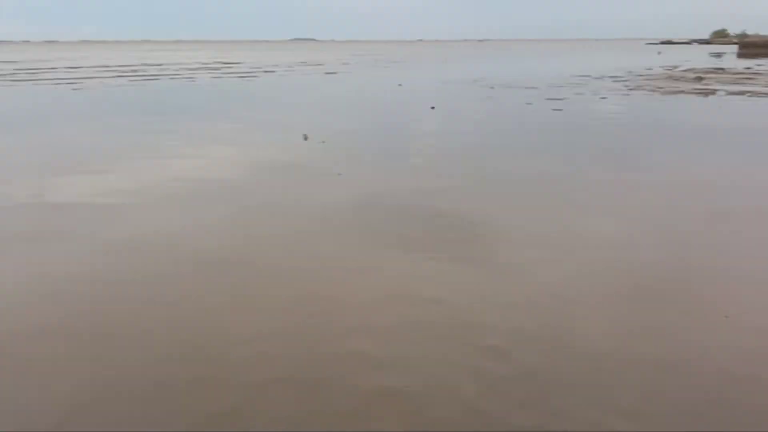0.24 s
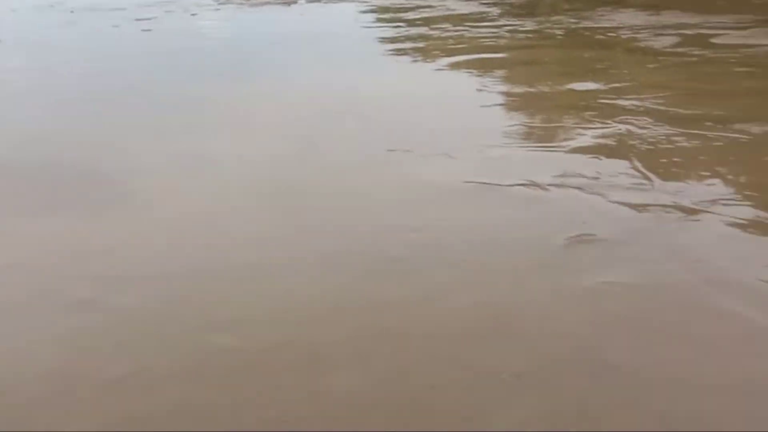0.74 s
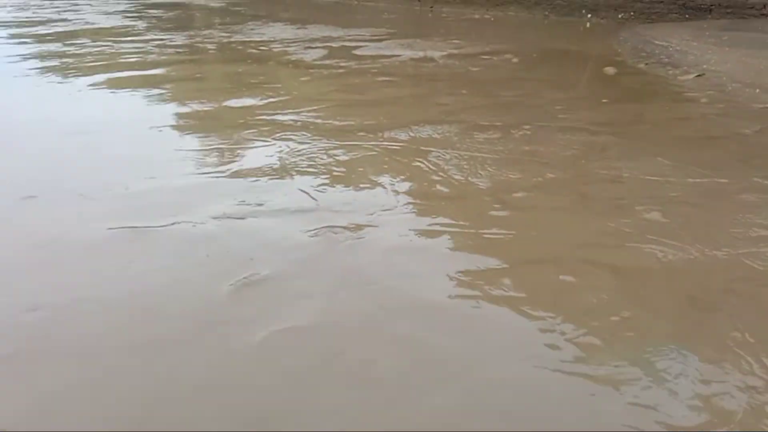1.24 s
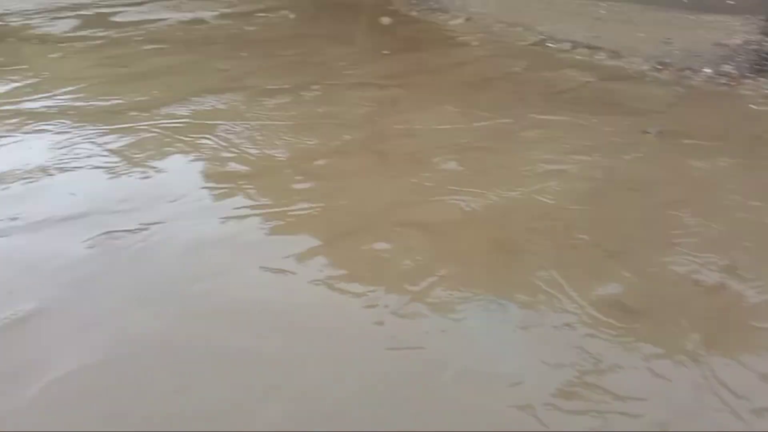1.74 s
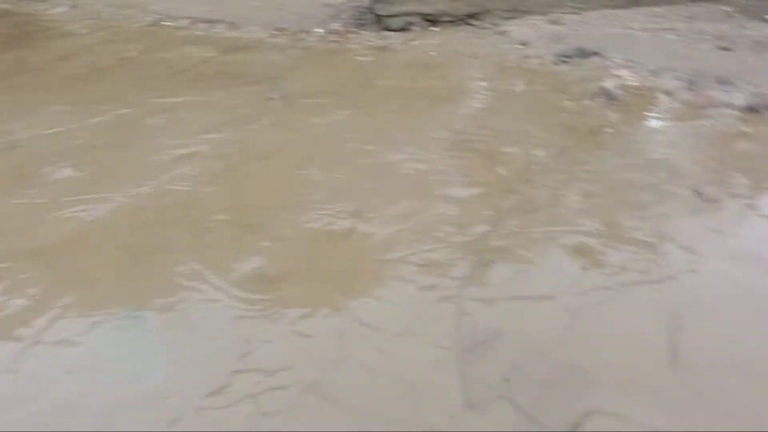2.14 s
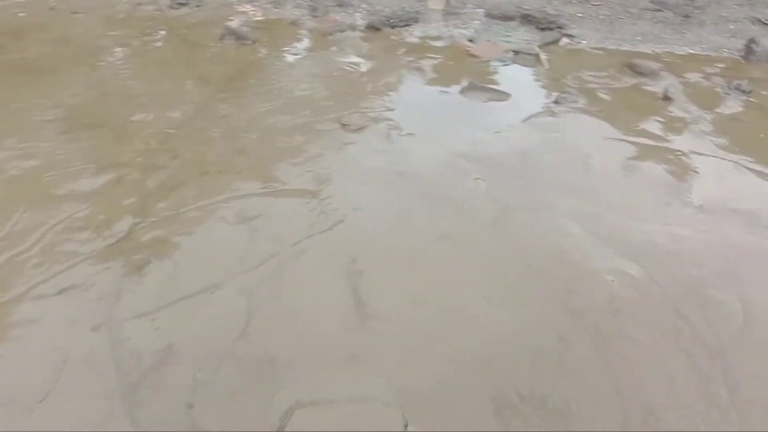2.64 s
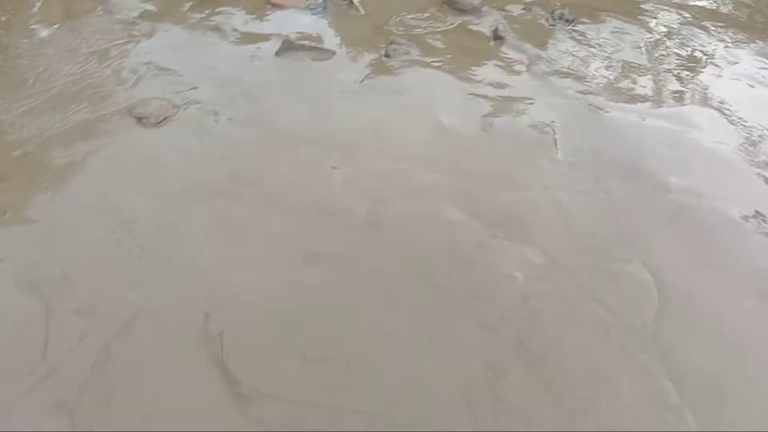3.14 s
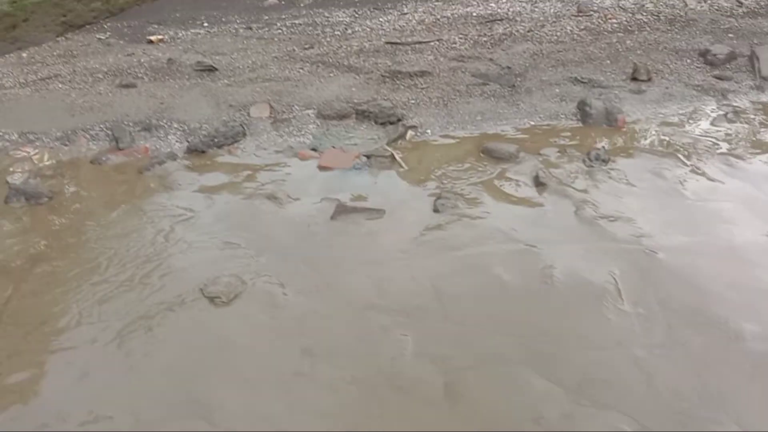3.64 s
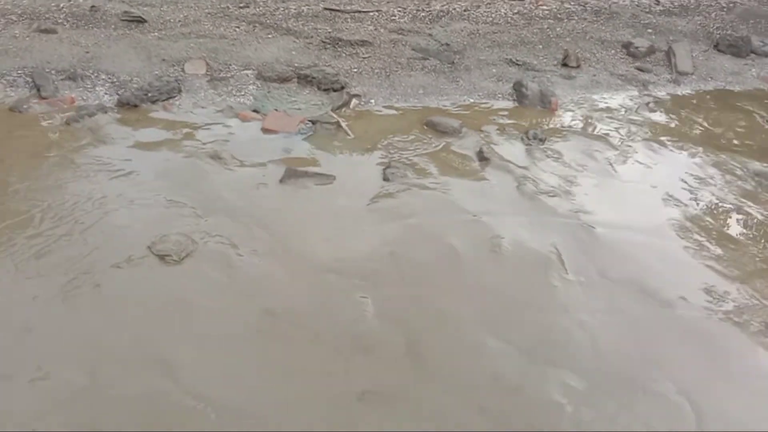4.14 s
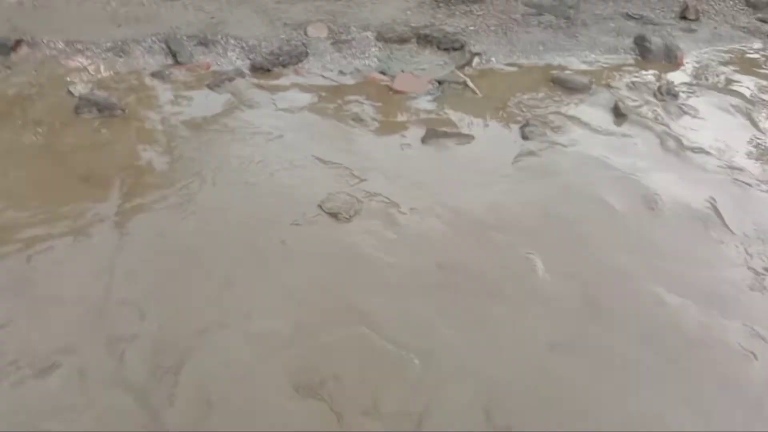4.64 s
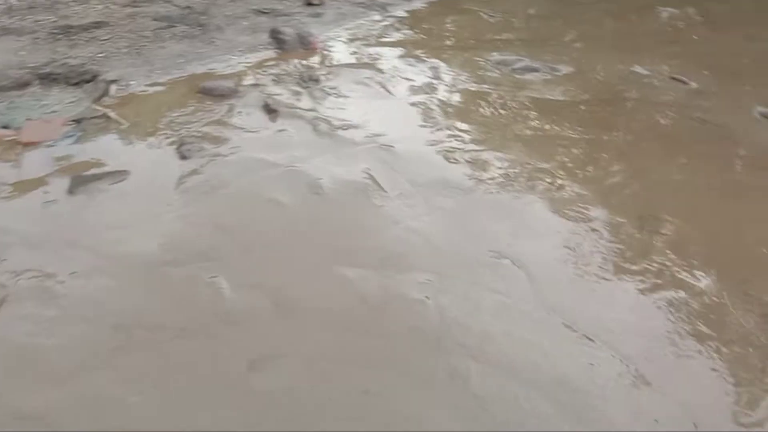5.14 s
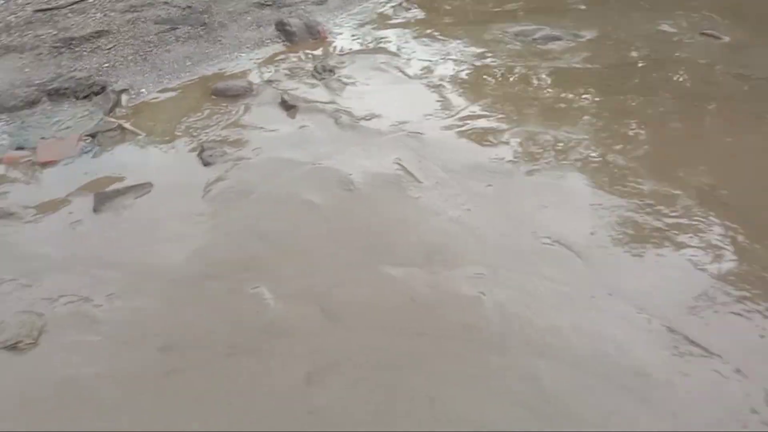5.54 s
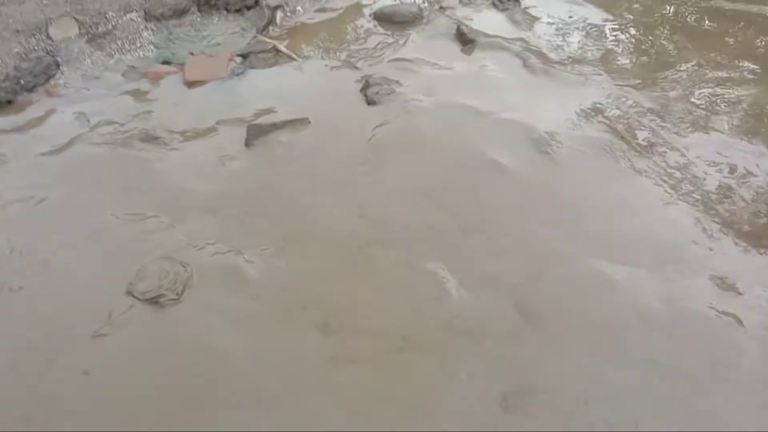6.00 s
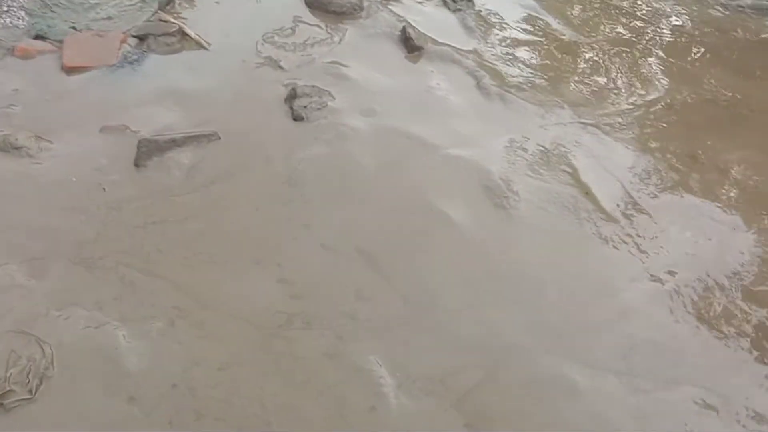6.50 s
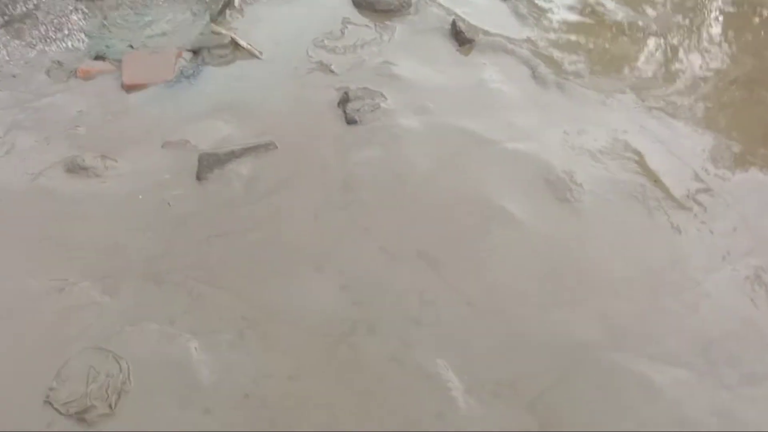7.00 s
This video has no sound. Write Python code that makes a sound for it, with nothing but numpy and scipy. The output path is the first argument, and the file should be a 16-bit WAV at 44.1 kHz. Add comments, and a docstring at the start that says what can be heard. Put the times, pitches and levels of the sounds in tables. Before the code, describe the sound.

An open, nearly echo-free muddy shore, heard close up, with faint hiss and light wind. A small pop or two at 0.2-0.3 s leads into a squelchy double step at 0.4-0.7 s, full of rising bubble blips, wet crackle and a hollow pop. Steps then pause while low wind rumbles and knocks the microphone, heaviest from 1.5 to 2.3 s. A deeper, gulping, sloshing step runs 1.95-2.4 s, with a distinct plop near 2.6. From 3.0 to 4.0 s softer squelches give way to many small bubbles and seeping water. A quieter stretch follows, with a plop at 4.5 and a wind bump at 4.6. A strong splashy squelch with bright spatter comes at 5.0-5.4 s, then a lull with soft wind. Another sharp, bubbly step bursts at 6.6-6.85 s, with a last little blip near 6.96 before it settles. Very faint, thin bird whistles fall far away.

```python
"""First a faint background hiss and light wind at the microphone, then slow steps in soft mud on an open tidal flat.
Each step is built from swarms of rising bubble notes, a slosh of noise, wet crackle and a fine spray of ticks.
Squirts of crackle, loud single bubbles, popping air pockets and seeping water fill in the mud, with a short scatter.
Noise gusts and low knocks buffet the microphone; far off, thin falling whistles are the birds."""
import sys
import numpy as np
from scipy import signal
from scipy.fft import rfft, irfft
from scipy.io import wavfile
from scipy.ndimage import uniform_filter1d

SR = 44100
rng = np.random.default_rng(int(sys.argv[2]) if len(sys.argv) > 2 else 0)


def to_wav(sig):
    """Store sig (one row per channel, or 1-D mono) as 16-bit WAV at the path in sys.argv[1].

    Samples outside -1..1 are clipped; the rate is SR.
    """
    pcm = np.clip(np.atleast_2d(sig), -1, 1) * 32767
    pcm = np.round(pcm).astype(np.int16)
    wavfile.write(sys.argv[1], SR, pcm.T)  # frames by channels


N = 320166
TIME = np.arange(N) / SR


def amp(db):
    """Decibels to gain."""
    return 10 ** (np.asarray(db) / 20)


def steadied(x, seconds):
    """Holds the running rms near 1, leaving faster detail alone."""
    size = max(int(seconds * SR / 2), 2)
    power = abs(uniform_filter1d(uniform_filter1d(x ** 2, size), size))
    return x / np.sqrt(power + 1e-3 * power.mean() + 1e-20)


def add(mix, s, sound):
    """Mixes a sound in at time s, cutting it at the end of the mix."""
    part = mix[max(round(s * SR), 0):][:len(sound)]
    part += sound[:len(part)]


def impulse(points, size=4096):
    """The minimum-phase impulse response of a spectrum that falls 24 dB per octave beyond its ends."""
    hz, db = np.transpose(points)
    octave = np.log2(np.fft.rfftfreq(size, 1 / SR) + 1)
    below = np.maximum(np.log2(hz[0]) - octave, 0)
    above = np.maximum(octave - np.log2(hz[-1]), 0)
    level_db = np.interp(octave, np.log2(hz), db) - 24 * (below + above)
    log_gain = np.log(amp(np.maximum(level_db, -100)))
    # folding the cepstrum onto positive time makes the response causal
    fold = np.r_[1, np.full(size // 2 - 1, 2), 1, np.zeros(size // 2 - 1)]
    return irfft(np.exp(rfft(irfft(log_gain) * fold)))


def coloured(x, points):
    """Gives x a spectrum."""
    return signal.oaconvolve(x, impulse(points))[:len(x)]


# the faint hiss behind everything: (time [s], level [dB], centre of its broad hump [Hz])
HISS_COURSE = [(0, -63.5, 1770), (.3, -61, 2370), (1.05, -64, 2700), (1.35, -65, 3420), (2.72, -63.5, 3000),
               (2.87, -74, 1970), (3.25, -62.5, 2480), (4.3, -68, 2000), (5.65, -64.5, 1830),
               (5.95, -71, 1810), (6.299, -65.5, 1570), (7.26, -73.5, 1870)]
# tone of the hiss: (frequency [Hz], relative level [dB])
HISS_SPECTRUM = [(450, -2), (800, -4.5), (2100, -5.5), (3600, -9), (5600, -23), (7700, -11), (9000, -38.5),
                 (15000, -20.5)]


def background_hiss(uneven_db, hump_db, hump_octaves):
    """Faint background hiss, uneven in level and tone; a broad hump in it slides up and down."""
    hz, t, z = signal.stft(rng.standard_normal(N), SR, nperseg=512)
    times, level_db, centre_hz = np.transpose(HISS_COURSE)
    uneven = rng.standard_normal(z.shape[::-1])
    uneven = uniform_filter1d(uneven, size=16, axis=0)  # smooth in time
    uneven = uniform_filter1d(uneven, size=4, axis=1).T  # smooth in frequency
    octaves_off = np.log2((hz[:, None] + 1) / np.interp(t, times, centre_hz))
    hump = np.exp(-(octaves_off / hump_octaves) ** 2)
    gain = amp(uneven_db * uneven / uneven.std() + hump_db * hump)
    noise = signal.istft(z * gain, nperseg=512)[1][:N]
    return amp(np.interp(TIME, times, level_db)) * steadied(coloured(noise, HISS_SPECTRUM), 0.26)


# the light air between gusts: (time [s], level before the eddies [dB])
LULL_COURSE = [(0, -65.5), (.6, -55), (2.65, -51), (3.55, -59.5), (4.35, -45.5), (5.15, -47), (5.85, -43.5),
               (6.6, -58.5), (7.26, -51)]
# gusts at the microphone: (start [s], length [s], level before the eddies [dB], hardness [0-1])
GUST_EVENTS = [(0.619, 0.0031, -27, 0.06), (0.768, 0.33, -33, 0.12), (1.545, 0.33, -25, 0.98),
               (1.945, 0.049, -22.5, 0.85), (2.114, 0.12, -20.5, 0.94), (2.338, 0.027, -29.5, 0.37),
               (2.481, 0.017, -27, 0.84), (2.954, 0.0037, -33.5, 0.22), (3.223, 0.092, -35, 0),
               (3.785, 0.0096, -35.5, 0.06), (3.923, 0.096, -38, 0), (4.6, 0.06, -27.5, 0.28),
               (4.914, 0.085, -34, 0.12), (5.586, 0.16, -32, 1), (6.126, 0.1, -29.5, 0),
               (6.266, 0.18, -32.5, 0.04), (6.769, 0.052, -33, 0), (6.998, 0.022, -34.5, 0.01)]
# light wind on the microphone: (frequency [Hz], relative level [dB])
LIGHT_WIND_SPECTRUM = [(25, -47), (75, 1.5), (115, 4), (175, -4.5), (250, -19.5), (420, -46)]
# strong wind on the microphone: (frequency [Hz], relative level [dB])
STRONG_WIND_SPECTRUM = [(25, -54.5), (75, -1.5), (115, 1), (200, -2.5), (270, -10), (420, -24.5),
                        (700, -60.5)]
GUST_DEPTH_DB = 21
GUST_RISE_S, GUST_FALL_S = 0.031, 0.038  # time the briefest gust takes to rise, and fall, by GUST_DEPTH_DB
RISE_PER_LENGTH, FALL_PER_LENGTH = 0.47, 0.22  # longer gusts come and go more slowly
EDDY_S, EDDY_DB = 0.012, 8  # spacing and greatest rise or dip of the lumps in the wind


def wind():
    """Eddies thump the microphone in lumpy gusts; harder gusts reach higher."""
    power = amp(np.interp(TIME, *np.transpose(LULL_COURSE))) ** 2
    hard_power = 0
    for s, length, db, hardness in GUST_EVENTS:
        early = np.maximum(s - TIME, 0) / (GUST_RISE_S + RISE_PER_LENGTH * length)
        late = np.maximum(TIME - s - length, 0) / (GUST_FALL_S + FALL_PER_LENGTH * length)
        gust = amp(db - GUST_DEPTH_DB * np.minimum(early + late, 10)) ** 2
        power = power + gust
        hard_power = hard_power + hardness * gust
    eddies = np.interp(TIME / EDDY_S, np.arange(1024), rng.uniform(-1, 1, 1024))
    strong = np.clip(hard_power / power, 0, 1)
    light = steadied(coloured(rng.standard_normal(N), LIGHT_WIND_SPECTRUM), 0.057)
    heavy = steadied(coloured(rng.standard_normal(N), STRONG_WIND_SPECTRUM), 0.057)
    blend = np.sqrt(1 - strong ** 2) * light + strong * heavy
    return np.sqrt(power) * amp(EDDY_DB * eddies) * blend


# single eddies that knock on the microphone: (time [s], level before shaping [dB])
KNOCK_EVENTS = [(.722, -12.5), (1.456, -16.5), (1.643, -8.5), (1.72, -9), (1.934, -8.5), (2.135, -10.5),
                (2.266, -11), (4.658, -19.5)]


def knocks(hz, cycles):
    """An eddy sweeps over the microphone: one brief, low swing of pressure."""
    out = np.zeros(N)
    t = np.arange(-.03, .03, 1 / SR)
    for s, db in KNOCK_EVENTS:
        swing = np.sin(2 * np.pi * hz * t) / np.cosh(hz * t / cycles)
        add(out, s + t[0], amp(db) * swing)
    return coloured(out, [(85, -0.24), (600, 0.96)])


# far bird calls: (start [s], length [s], first pitch before wavering [Hz])
BIRD_CALLS = [(2.76, 0.085, 7700), (4.48, 0.12, 7570), (6.219, 0.15, 7720)]
CALL_FALL = 0.91  # last pitch of a call over its first, before wavering


def birds(db, waver, flock_db, count):
    """Thin falling whistles, blurred by distance; the rest of the flock repeats them from farther off."""
    out = np.zeros(N)
    calls = [(*row, 0) for row in BIRD_CALLS]
    for when, (s, length, first_hz) in zip(rng.random(count), rng.choice(BIRD_CALLS, count)):
        calls.append((when * N / SR, length, first_hz * rng.uniform(CALL_FALL, 1), flock_db))
    for s, length, first_hz, far_db in calls:
        size = int(length * SR)
        wobble = 1 + waver * uniform_filter1d(rng.standard_normal(size), size=60)
        hz = np.linspace(first_hz, CALL_FALL * first_hz, size) * wobble
        whistle = np.hanning(size) * np.sin(2 * np.pi * np.cumsum(hz) / SR)
        add(out, s, amp(far_db) * whistle)
    return amp(db) * out


def scatter(x, db, t60):
    """A weak, short scatter off the water and the bank."""
    t = np.arange(SR // 3) / SR
    tail = rng.standard_normal(len(t)) * amp(-60 * t / t60) * (t > .003)
    return amp(db) * signal.oaconvolve(x, tail / np.linalg.norm(tail))[:N]


SHIVER_S, SHIVER_PITCH, SHIVER_DB = .004, .028, 3  # moving mud jostles each bubble: spacing, pitch share, level
CLIMB_CURVE = 1.35  # the climb of a bubble quickens toward its end
SWELL_CYCLES = 3.3  # a seeping or loud bubble swells for a few cycles


def bubble(first_hz, last_hz, swell, length):
    """A pocket of air rings and shivers; its pitch glides as it nears the surface, where a climbing one bursts."""
    t = np.arange(int(1.6 * length * SR) + 8) / SR
    knots = int(t[-1] / SHIVER_S) + 2
    shiver = np.interp(t / SHIVER_S, np.arange(knots), rng.uniform(-0.92, 1, knots))
    glide = (last_hz / first_hz) ** np.minimum(t / length, 1) ** CLIMB_CURVE
    hz = first_hz * glide * (1 + SHIVER_PITCH * shiver)
    dying = np.maximum(t - swell, 0) / max(length - swell, length / 4)
    bursting = max(np.log2(last_hz / first_hz), 0) * (t / length) ** 6
    shape = np.sin(np.pi / 2 * np.minimum(t / swell, 1)) * np.exp(-2.5 * dying - bursting)
    return shape * amp(SHIVER_DB * shiver) * np.sin(2 * np.pi * np.cumsum(hz) / SR)


def seep(db, per_s, low_hz, high_hz, cycles, climb, spread_db):
    """Faint stray bubbles as water creeps back into the footprints."""
    out = np.zeros(N)
    for when, pitch, strength in rng.random((int(per_s * N / SR), 3)):
        hz = low_hz * (high_hz / low_hz) ** pitch
        note = bubble(hz, hz * climb, SWELL_CYCLES / hz, cycles / hz)
        add(out, when * N / SR, amp(db - spread_db * strength) * note)
    return out


# tone of tearing wet mud, in pops and steps: (frequency [Hz], relative level [dB])
CRACK_SPECTRUM = [(1000, -6), (2300, 7.5), (5200, -2), (7800, -15), (9500, -29.5), (14000, -3)]
# air pockets snapping open: (time [s], crack peak [dB], ring level [dB], settled ring pitch [Hz], ring t60 [s])
POP_EVENTS = [(0.206, -37, -44, 4140, 0.022), (0.2673, -19, -27.5, 922, 0.04),
              (0.473, -24, -26, 12100, 0.012), (0.6076, -23.5, -12, 1380, 0.0043),
              (0.946, -31, -20.5, 1160, 0.037), (2.213, -44, -27, 13800, 0.0089),
              (5.2508, -36.5, -10.5, 1070, 0.0093), (6.779, -41, -35, 2980, 0.0076)]


def pop(s, crack_db, ring_db, hz, t60):
    """A film of mud tears with a crack and the open hollow rings, sagging in pitch over its first cycles."""
    t = np.arange(4096) / SR
    crack = coloured(rng.standard_normal(len(t)) * np.exp(-t / 0.0018), CRACK_SPECTRUM)
    turns = np.cumsum(hz * (1 + np.exp(-t * hz))) / SR
    build_up = np.tanh(2 * turns) ** 2  # within one cycle
    ring = build_up * amp(ring_db - 60 * t / t60) * np.sin(2 * np.pi * turns)
    return s, amp(crack_db) * crack / abs(crack).max() + ring


# mud squeezed out from under the sole: (start [s], length [s], level [dB], strongest pitch [Hz])
SQUIRT_EVENTS = [(0.433, 0.0024, -38.5, 3080), (0.602, 0.014, -31.5, 2680), (0.639, 0.023, -35.5, 3770),
                 (1.235, 0.0085, -56.5, 4160), (2.042, 0.022, -38.5, 1890), (2.207, 0.018, -43, 3520),
                 (2.304, 0.011, -38.5, 1530), (2.338, 0.0028, -42.5, 4900), (3.039, 0.022, -42, 2730),
                 (4.753, 0.013, -59.5, 3900), (5.01, 0.0032, -27.5, 3700), (5.22, 0.019, -33, 2600),
                 (5.267, 0.0072, -30.5, 2400), (6.714, 0.0012, -22.5, 2710), (6.781, 0.023, -34, 2290),
                 (6.846, 0.0056, -36, 3340)]
# treble of a squirt: (frequency [Hz], level against the strongest pitch [dB])
SQUIRT_TREBLE_SPECTRUM = [(7800, -28.5), (9500, -47), (14000, -27)]
SQUIRT_RISE_S, SQUIRT_FALL_S = 0.00092, 0.001


def squirt(s, length, db, hz):
    """Many tiny films burst at once: dense, uneven crackle around one broad resonance."""
    t = np.arange(int((length + .03) * SR)) / SR
    ticks = rng.standard_normal(len(t)) * amp(35.4 * rng.random(len(t)) ** 28)  # a few stand far out
    resonance = [(0.42 * hz, -14), (hz, 0), (1.28 * hz, -7), *SQUIRT_TREBLE_SPECTRUM]
    crackle = steadied(coloured(ticks, resonance), 0.0091)
    shape = np.minimum(t / SQUIRT_RISE_S, 1) * np.exp(-np.maximum(t - length, 0) / SQUIRT_FALL_S)
    return s, amp(db) * shape * crackle


# the loudest bubbles: (start [s], level before shivering [dB], first pitch [Hz], last / first pitch, glide time [s])
LOUD_BUBBLES = [ (0.249, -28, 3830, 1.14, 0.0057), (0.499, -29.5, 554, 2.42, 0.03),
                (0.517, -25.5, 807, 2.2, 0.016), (0.557, -36, 2500, 2.1, 0.015),
                (0.59, -27.5, 1835, 1.4, 0.0083), (0.699, -32, 1097, 2.17, 0.033),
                (1.466, -41, 2234, 1.05, 0.028), (1.991, -28, 1104, 2.1, 0.019),
                (2.098, -32, 550, 1.7, 0.049), (2.381, -36, 3140, 1.27, 0.0073),
                (2.436, -32.5, 4360, 1.32, 0.0069), (2.516, -33.5, 1990, 2.14, 0.014),
                (2.632, -20.5, 1126, 0.89, 0.015), (2.951, -41, 2080, 1.18, 0.015),
                (2.989, -32.5, 1317, 1.11, 0.021), (3.044, -25.5, 1200, 0.79, 0.0018),
                (3.06, -33, 1270, 1.05, 0.0071), (3.097, -32.5, 537, 1.7, 0.0095),
                (3.159, -36, 1056, 1.32, 0.0092), (3.263, -44, 830, 0.94, 0.044),
                (3.352, -23, 2650, 0.83, 0.0053), (3.386, -31, 470, 1.57, 0.053),
                (3.482, -39.5, 724, 0.95, 0.049), (3.483, -36.5, 3110, 0.87, 0.0076),
                (3.546, -41, 663, 3.05, 0.066), (3.607, -33.5, 420, 2.03, 0.11),
                (3.636, -38.5, 946, 2.3, 0.084), (3.642, -34, 1600, 0.65, 0.0082),
                (3.651, -34.5, 539, 4.7, 0.082), (3.706, -38, 636, 1.7, 0.082),
                (3.727, -32, 1080, 1.9, 0.019), (3.846, -40, 1660, 1.3, 0.018),
                (3.88, -37, 1580, 1.3, 0.012), (3.904, -36.5, 2250, 0.75, 0.009),
                (3.953, -30, 1900, 1.2, 0.0047), (4.006, -44.5, 647, 1.08, 0.087),
                (4.154, -51, 3060, 1, 0.012), (4.501, -25.5, 1149, 0.92, 0.028),
                (4.977, -26, 1078, 0.815, 0.013), (4.999, -33.5, 3750, 1.2, 0.016),
                (5.186, -41.5, 367, 1.36, 0.051), (5.252, -23, 848, 1.55, 0.042),
                (5.271, -22, 1162, 1.48, 0.036), (5.272, -35, 432, 1.18, 0.037),
                (5.303, -22.5, 2230, 1.56, 0.016), (5.352, -25, 1075, 1.55, 0.014),
                (5.351, -32, 472.5, 1.19, 0.092), (5.379, -31, 1272, 2.45, 0.034),
                (5.415, -28, 1434, 0.87, 0.015), (5.481, -52.5, 970, 1.5, 0.11),
                (6.569, -27, 1012, 2.5, 0.0183), (6.676, -31, 1655, 2.45, 0.017),
                (6.701, -17, 2505, 1.3, 0.013), (6.808, -22.5, 1740, 0.76, 0.02),
                (6.911, -34, 3660, 0.83, 0.0042), (6.962, -30, 1915, 1.8, 0.018),
                (6.96, -46.5, 590, 2.17, 0.076)]
SWELL_PER_CLIMB = 0.19  # a bubble whose pitch moves far swells for more of its life


def loud_bubbles():
    """Single bubbles that stand out of the mud, each ringing at its own pitch."""
    out = np.zeros(N)
    for s, db, hz, climb, length in LOUD_BUBBLES:
        swell = SWELL_CYCLES / hz + SWELL_PER_CLIMB * abs(climb - 1) * length
        add(out, s, amp(db) * bubble(hz, hz * climb, swell, length))
    return out


def swarm(size, low_hz, high_hz, per_s, cycles, climb, spread_db, tilt_db):
    """Bubbles of random size and strength, at an even overall level."""
    out = np.zeros(size)
    for when, pitch, life, rise, strength, soft in rng.random((int(per_s * size / SR) + 1, 6)):
        hz = low_hz * (high_hz / low_hz) ** pitch
        last_hz = hz * (1 + climb * (1.555 * rise - .2))
        length = cycles * 2 ** (2 * life - 1) / hz  # half to twice the given cycles
        db = -spread_db * np.log(1 - .98 * strength) + tilt_db * pitch
        swell = length * (.1 + .45 * soft)
        add(out, when * size / SR, amp(db) * bubble(hz, last_hz, swell, length))
    return steadied(out, 0.062)


def spray(level, band, busy_db, spread_db):
    """Tiny droplets and tearing films: unequal ticks, sparse when faint, a thousand a second at busy_db."""
    chance, strength, hiss = rng.random((len(level), 3)).T
    struck = chance < level / amp(busy_db) * 1000 / SR
    hits = struck * amp(-spread_db * np.log(1 - .99 * strength))
    keep = np.exp(-1 / (0.0001 * SR))
    ticks = signal.lfilter([1], np.poly([keep, keep]), hits) * (hiss - .5)
    return level * steadied(coloured(ticks, band), 0.14)


ENTRY_DB_PER_S = 238  # how fast the splash builds as the sole meets the water


def churn(t, press, pull, entry_db, exit_db, settle_db_per_s):
    """Gain over one step: the foot enters, presses to its deepest, pulls free, and the water settles."""
    in_water = np.interp(t, [0, press, press + pull], [entry_db, 0, exit_db])
    building = ENTRY_DB_PER_S * np.minimum(t, 0)
    settling = settle_db_per_s * np.maximum(t - press - pull, 0)
    return amp(in_water + building - settling)


# slurry full of bubbles too many to tell apart: (frequency [Hz], relative level [dB])
SLOSH_SPECTRUM = [(1050, -5.5), (1600, 5.5), (2700, -7)]
# tone of the flung drops: (frequency [Hz], relative level [dB])
SPRAY_SPECTRUM = [(4000, -49), (7500, 0.5), (9500, -13.5), (11500, -6.5), (13000, 4.5), (15500, -0.5)]
# each push of a foot in the mud, levels before the layer gains in step(): (start [s], pressing in [s],
# pulling out [s], large bubbles [dB], middling bubbles [dB], small bubbles [dB], spray [dB], spray flight [s])
STEP_EVENTS = [ (0.435, 0.087, 0.063, -58, -43, -46, -57, .0),
               (0.605, 0.013, 0.069, -50.5, -38.5, -39.5, -51.5, 0.0042),
               (1.95, 0.052, 0.071, -48.5, -36, -50.5, -63, 0.095),
               (2.096, 0.04, 0.093, -38, -39.5, -52.5, -59.5, 0.05),
               (2.289, 0.025, 0.065, -65, -42, -51.5, -51, 0.032),
               (3.041, 0.011, 0.052, -43.5, -44.5, -53.5, -63.5, .0),
               (3.386, 0.015, 0.15, -56.5, -52.5, -59, -65.5, .0),
               (3.62, 0.11, 0.072, -44, -44, -61.5, -66, 0.03),
               (3.85, 0.041, 0.097, -66.5, -50, -56.5, -62, 0.12),
               (5.011, 0.23, .04, -55, -37, -44.5, -42, 0.025),
               (5.25, 0.021, 0.12, -43, -37.5, -38, -52.5, 0.04),
               (6.592, 0.02, 0.07, -85, -35.5, -46.5, -50.5, 0.089),
               (6.7, 0.082, 0.09, -90, -39, -38, -45.5, 0.0023),
               (6.964, 0.0066, 0.064, -62.5, -54, -61, -61, 0.017)]
LEAD_S, TAIL_S = .12, .5  # time given to the water before the foot enters and after it pulls free
DRIP_S, DRIP_DB = 0.16, -21  # a thin rain of drops follows each splash; its level is relative to the spray
FULL_GURGLE_DB, FULL_FIZZ_DB = -36.5, -40.5  # a full push; a weaker one frees fewer bubbles, so single ones show


def step(s, press, pull, large_db, middling_db, small_db, spray_db, flight):
    """A foot churns the water in quick surges: gulps, gurgle, slurry slosh, fizz, wet mud crackle, and spray."""
    t = np.arange(-LEAD_S, press + pull + TAIL_S, 1 / SR)
    large = amp(large_db) * churn(t, press, pull, entry_db=-8.5, exit_db=-20, settle_db_per_s=195)
    stirred = churn(t, press, pull, entry_db=-5.5, exit_db=-7.0, settle_db_per_s=213.5)
    middling, small = amp(middling_db) * stirred, amp(small_db) * stirred

    thrown = churn(t - flight, press, pull, entry_db=-20, exit_db=-6.5, settle_db_per_s=84.5)
    drip_times = [-press - pull, 0, DRIP_S, DRIP_S + 0.062]
    dripping = amp(DRIP_DB) * np.interp(t - press - pull, drip_times, [0, 1, 1, 0])
    mist = amp(spray_db) * np.hypot(thrown, dripping)

    moments = np.arange(t[0], t[-1], .018)
    surge = amp(np.interp(t, moments, rng.uniform(-8, 5, len(moments))))

    gulps = amp(4.5) * large * swarm(len(t), 426.8, 892, per_s=140, cycles=20, climb=0.65,
                                     spread_db=6.5, tilt_db=11)
    gurgle_per_s = 650 * amp(.5 * (middling_db - FULL_GURGLE_DB))
    gurgle = amp(-0.5) * middling * swarm(len(t), 1001.0, 2396, per_s=gurgle_per_s, cycles=20, climb=0.42,
                                          spread_db=7, tilt_db=3.5)
    # only a full push blends its bubbles into a slosh
    crowded = amp(.5 * min(middling_db - FULL_GURGLE_DB, 0))
    slurry = steadied(coloured(rng.standard_normal(len(t)), SLOSH_SPECTRUM), pull)
    slosh = amp(-9) * crowded * middling * slurry
    fizz_per_s = 1400 * amp(small_db - FULL_FIZZ_DB)
    fizz = small * swarm(len(t), 2600, 6500, per_s=fizz_per_s, cycles=19, climb=0.17,
                         spread_db=9, tilt_db=-12.0)
    crackle = amp(-4.5) * spray(small, CRACK_SPECTRUM, busy_db=-46.5, spread_db=7.5)
    drops = amp(2.0) * spray(mist, SPRAY_SPECTRUM, busy_db=-52.0, spread_db=9.5)

    splash = gulps + surge * (gurgle + slosh + fizz + crackle + drops)
    return s - LEAD_S, splash * signal.windows.tukey(len(t), .04)


def scene():
    """Hiss, wind and birds over the open flat, with seeping water, pops, squirts, bubbles and steps."""
    air = background_hiss(uneven_db=4.5, hump_db=7, hump_octaves=0.95)
    air = air + wind() + knocks(hz=155, cycles=0.25)
    air = air + birds(db=-63.5, waver=0.29, flock_db=-9, count=14)
    mud = seep(db=-57.5, per_s=7.6, low_hz=1350, high_hz=4550, cycles=19, climb=1.15, spread_db=7.5)
    for row in POP_EVENTS:
        add(mud, *pop(*row))
    for row in SQUIRT_EVENTS:
        add(mud, *squirt(*row))
    mud = mud + loud_bubbles()
    for row in STEP_EVENTS:
        add(mud, *step(*row))
    return (air + mud + scatter(mud, db=-13.0, t60=0.099))[None]


EDGE_HZ = 15900


def record(dry):
    """The recorder's band limit: a steep low-pass at EDGE_HZ."""
    low_pass = signal.firwin(401, EDGE_HZ, window=("kaiser", 9), fs=SR)
    return signal.oaconvolve(dry, low_pass[None], "same")


dry = scene()
out = record(dry)
to_wav(out)
```